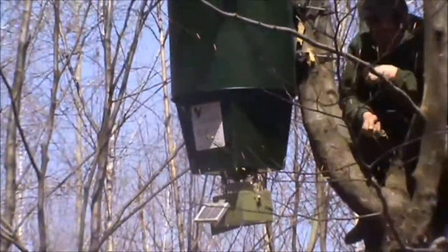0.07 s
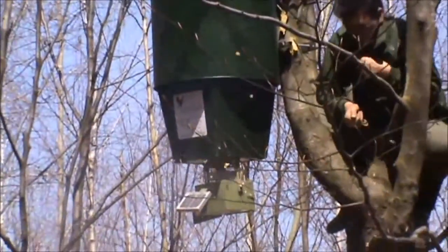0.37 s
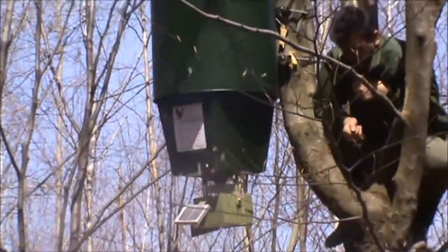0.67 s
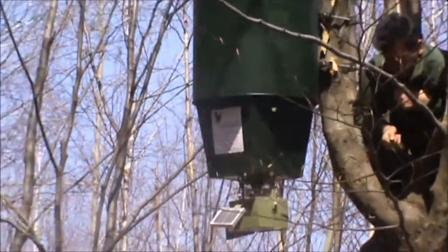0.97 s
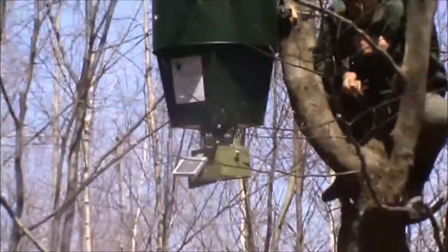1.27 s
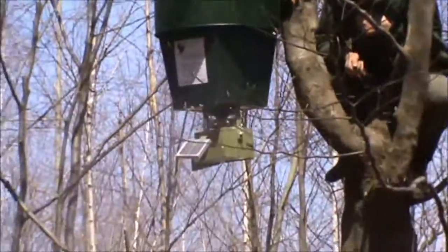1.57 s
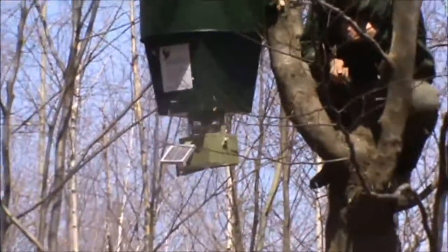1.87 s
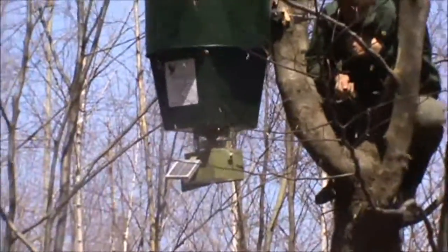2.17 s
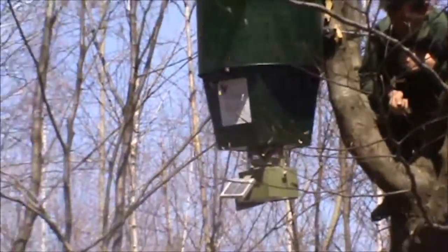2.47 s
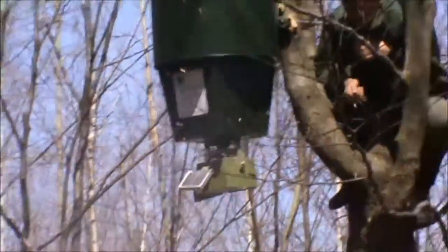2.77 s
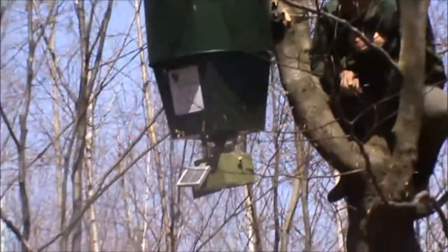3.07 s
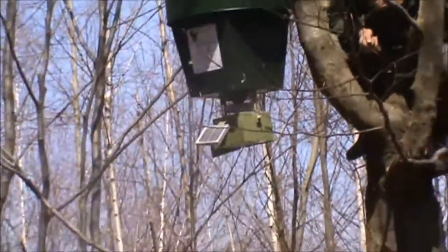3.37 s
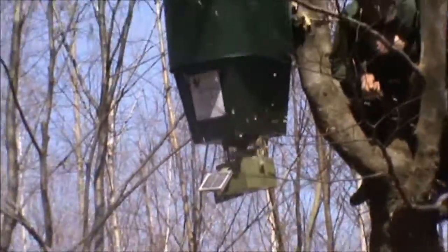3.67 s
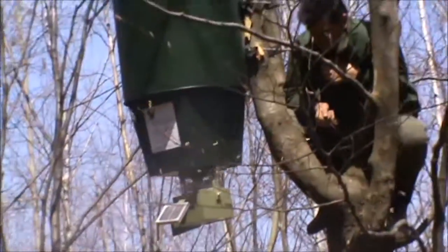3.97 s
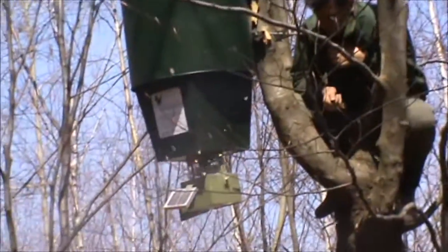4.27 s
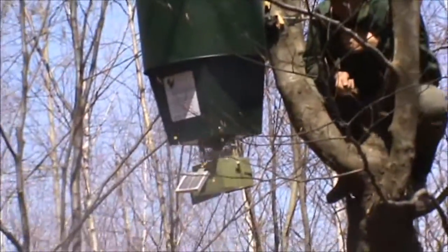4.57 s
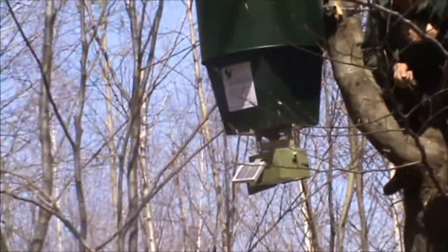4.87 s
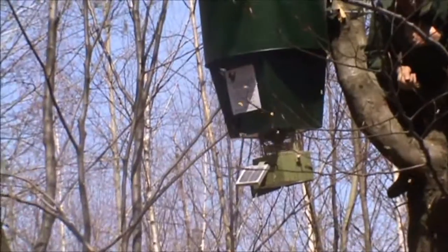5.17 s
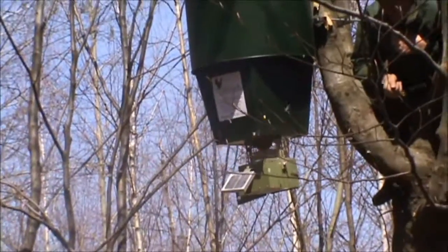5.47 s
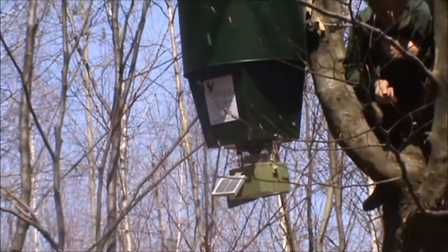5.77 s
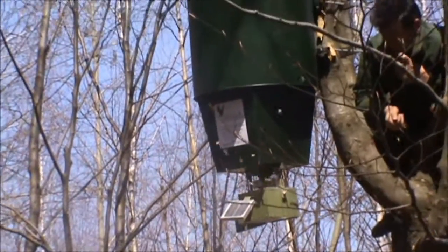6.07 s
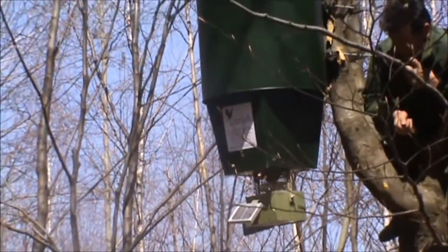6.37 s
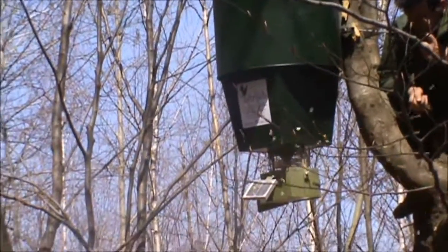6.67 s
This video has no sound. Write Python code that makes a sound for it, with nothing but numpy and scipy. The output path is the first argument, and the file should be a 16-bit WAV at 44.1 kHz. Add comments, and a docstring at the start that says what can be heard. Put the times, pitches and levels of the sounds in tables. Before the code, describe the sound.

Outdoors among trees, grain sprays off a feeder's spinning metal plate in a bright, continuous, rattling hiss, with the motor shaking the housing into a low drone. A stray kernel knocks sharply early on, and a few more tick later. Through the middle, brief jolts thump the hollow housing, and the spray dips twice before recovering. Soft puffs of air brush the microphone.

```python
"""A game feeder runs at full speed in a tree: its motor whirls a metal plate that flings grain at the guard.
From the start, thousands of kernel hits a second merge into a ringing hiss over the drone of the shaken
housing; a faint breeze rumbles on the microphone. From 0.1 s stray kernels knock on things nearby, and from 0.2
s puffs of air pass. Between 2.2 and 5.3 s hard jolts make the housing boom. At 2.7 and 4.2 s the hiss and drone
dip abruptly, then creep back."""
import sys
import numpy as np
from scipy import signal
from scipy.fft import rfft, irfft, next_fast_len
from scipy.io import wavfile
from scipy.ndimage import map_coordinates

SR = 44100
rng = np.random.default_rng(int(sys.argv[2]) if len(sys.argv) > 2 else 0)


def wrap_up_sound(samples):
    """Save the sound to the file named by the first command line argument, as 16-bit audio."""
    columns = np.atleast_2d(samples).T
    # keep every value between -1 and 1, then stretch to whole-number steps
    tamed = np.clip(columns, -1, 1)
    steps = np.round(tamed * 32767).astype(np.int16)
    wavfile.write(sys.argv[1], SR, steps)


N = 304819


def amp(db):
    """Decibels to gain."""
    return 10 ** (np.asarray(db) / 20)


def rms(x):
    """Root mean square."""
    return np.sqrt(np.mean(x ** 2) + 1e-20)


def along(points, hz):
    """(frequency [Hz], value) points read on a log axis."""
    point_hz, values = np.transpose(points)
    return np.interp(np.log(hz + 1), np.log(np.abs(point_hz) + 1), values)


def curves(rows):
    """One value per sample for each column after the time."""
    times_s, *columns = np.transpose(rows)
    return [np.interp(np.arange(N) / SR, times_s, column) for column in columns]


def wobble(rate_hz, samples=np.arange(N)):
    """Smooth random curve, rate_hz knots a second."""
    knots = rng.standard_normal(int(N * rate_hz / SR) + 4)
    return map_coordinates(knots, [samples * rate_hz / SR])


def scatter(count, limit):
    """Normal draws, clipped at +/- limit."""
    return np.clip(rng.standard_normal(count), -limit, limit)


def filtered(x, response):
    """x through a complex response of frequency."""
    size = next_fast_len(N + SR // 4, real=True)
    return irfft(rfft(x, size) * response(np.fft.rfftfreq(size, 1 / SR)), size)[..., :N]


def resonance(f, hz, width_hz):
    """Causal response of one mode, 1 at its peak."""
    return 1j * f * width_hz / (hz * hz - f * f + 1j * f * width_hz)


def rumble(spectrum):
    """Shaped noise, rms 1."""
    noise = filtered(rng.standard_normal(N), lambda f: amp(along(spectrum, f)))
    return noise / rms(noise)


def add(track, start_s, sound):
    """Mix a short sound into a track."""
    part = track[max(round(start_s * SR), 0):][:len(sound)]
    part += sound[:len(part)]


def kernel_hits(flow, per_s, size_db, clump_db, clump_hz):
    """Impulses on one surface, rms 1: kernels of uneven size arrive in clumps."""
    density_per_s = per_s * flow * amp(clump_db * wobble(clump_hz))
    struck = np.flatnonzero(rng.random(N) < density_per_s / SR)
    hits = np.zeros(N)
    hits[struck] = amp(size_db * scatter(len(struck), 2))
    return hits / rms(hits)


# plate and guard modes: (frequency [Hz], width [Hz], gain [dB])
METAL_MODES = [(1279, 32, -13.7), (1364, 42, -10.1), (1449, 16, -18.8), (1648, 122, -12.7),
               (2000, 324, -17.3), (2545, 54, -14.3), (2891, 85, -7.8), (3221, 121, -10.8),
               (3665, 145, -17.0), (4018, 119, -8.3), (4217, 76, -14.1), (4521, 121, -14.4),
               (4698, 154, -13.9), (5439, 138, -12.9), (5640, 104, -7.6), (5856, 47, -12.9),
               (6022, 71, -12.7), (6209, 112, -14.7), (6517, 121, -11.6), (6877, 326, -18.2),
               (8890, 274, -11.9), (9747, 204, -12.9), (10082, 194, -7.7), (10816, 309, -12.3),
               (11137, 54, -8.9), (12240, 574, -11.9), (12969, 805, -9.9)]

def clatter(hits, spot_db, wander_db, wander_hz, cluster_hz, highpass_hz):
    """Each kernel lands on another spot of the metal and rings the modes at new strengths."""
    struck, ring = np.flatnonzero(hits), np.zeros(N)
    for hz, width_hz, db in METAL_MODES:
        # the stream wanders over the guard, favouring each mode in turn
        favour_db = wander_db * wobble(wander_hz, struck)
        # peaks wider than cluster_hz hold many modes, which average out
        averaging = min(1, (cluster_hz / width_hz) ** 0.5)
        strength_db = averaging * (spot_db * scatter(len(struck), 3) + favour_db)
        push = np.zeros(N)
        push[struck] = hits[struck] * rng.choice([-1, 1], len(struck)) * amp(strength_db)
        ring += amp(db) * signal.lfilter(*signal.iirpeak(hz, hz / width_hz, SR), push / rms(push))
    # the small plate radiates little bass
    return signal.lfilter(*signal.butter(2, highpass_hz, "high", fs=SR), ring)


# dry crack of a kernel: (frequency [Hz], gain [dB])
CRACK_SPECTRUM = [(150, -42.5), (300, -35), (600, -44), (1100, -31.5), (1700, -33), (2500, -35),
                  (5000, -24.5), (7500, -20.5), (9000, -15.5), (13000, -24), (14000, -20), (15600, -20)]

def crackle(hits, t60_s, colour_db):
    """Each hit is a short noise burst with its own share of every band."""
    edges_hz = [0, 2500, 5000, 8000, 11000, 16000]
    fade = amp(-60 * np.arange(SR // 20) / SR / t60_s)
    out = np.zeros(N)
    for low_hz, high_hz in zip(edges_hz, edges_hz[1:]):
        sizes = hits * amp(colour_db * scatter(N, 2))
        power = np.abs(signal.oaconvolve(sizes ** 2, fade ** 2)[:N])
        burst = np.sqrt(power / power.mean()) * rng.standard_normal(N)
        out += filtered(burst, lambda f: amp(along(CRACK_SPECTRUM, f)) * (f >= low_hz) * (f < high_hz))
    return out


# notches where neighbouring modes cancel: (frequency [Hz], width [Hz], depth [0-1])
ANTIRESONANCES = [(1005, 54, 0.7), (1490, 26, 0.4), (2346, 35, 0.57), (2750, 130, 0.02), (3350, 44, 0.2)]

def spinner(flow, hiss_db, ring_db, split_hz=7300):
    """Kernels strike plate and guard: square hits ring the modes, glancing ones hiss, hard ones tick."""
    def notches(f):
        cuts = [1 - depth * resonance(f, hz, width_hz) for hz, width_hz, depth in ANTIRESONANCES]
        return np.prod(cuts, axis=0)

    square = kernel_hits(flow, per_s=3800, size_db=1, clump_db=0.5, clump_hz=100)
    glancing = kernel_hits(flow, per_s=6700, size_db=1, clump_db=0.4, clump_hz=31)
    hard = kernel_hits(flow, per_s=130, size_db=2.5, clump_db=1, clump_hz=20)
    spray = clatter(square, spot_db=5.5, wander_db=1.5, wander_hz=45, cluster_hz=300, highpass_hz=960)
    spray += amp(-1.1) * crackle(glancing, t60_s=0.018, colour_db=6.5)
    spray += amp(-4.5) * crackle(hard, t60_s=0.032, colour_db=3)
    spray = filtered(spray, notches)
    ring = filtered(spray, lambda f: f < split_hz)
    hiss = spray - ring
    return amp(hiss_db) * hiss / rms(hiss) + amp(ring_db) * ring / rms(ring)


# motor housing and hopper modes: (frequency [Hz], width [Hz], gain [dB])
HOUSING_MODES = [(372.5, 42.6, -11.5), (409.2, 49.5, -6.5), (511.3, 44.6, -9.5), (706, 128, -23.5),
                 (898, 230, -23)]

def housing(flow, band_db):
    """The motor and grain dragged under its plate shake the hollow housing into a rough drone."""
    shake = kernel_hits(flow, per_s=2200, size_db=2, clump_db=2.5, clump_hz=70)
    drone = np.zeros(N)
    for hz, width_hz, db in HOUSING_MODES:
        push = shake * rng.standard_normal(N)
        drone += filtered(push, lambda f: amp(db) * resonance(f, hz, width_hz) ** 2)
    band = filtered(drone, lambda f: (f > 330) & (f < 560))
    return amp(band_db) * drone / rms(band)


# slow swell of the grain stream: (time [s], hiss level [dB], ring re hiss [dB])
GRAIN_STREAM = [(0.0, -15.5, -3.5), (0.48, -15.5, -5), (0.6, -16, -3), (1.1, -15.5, -3.5), (1.8, -16, -3.5),
                (2.6, -14.5, -3.5), (3.2, -14.5, -3), (3.9, -15, -4), (5.3, -16.0, -3.5),
                (5.8, -15.7, -4.5), (6.9, -15, -3.5)]

def feeder(flow, drone_re_ring_db=-11.5, drone_db_per_db=1.15):
    """One face of the feeder: grain hisses and rings on the metal; the drone follows the ring's level."""
    hiss_db, ring_re_hiss_db = curves(GRAIN_STREAM)
    ring_db = hiss_db + ring_re_hiss_db
    drone_db = ring_db.mean() + drone_re_ring_db + drone_db_per_db * (ring_db - ring_db.mean())
    return spinner(flow, hiss_db, ring_db) + housing(flow, drone_db)


# uneven grain flow: (rate [Hz], depth [dB])
FLOW_SURGES = [(3, 0.09), (14, 0.82), (55, 0.67)]

def grain_flow():
    """Factor on the hit rate: grain leaves the hopper in surges."""
    return amp(sum(depth_db * wobble(rate_hz) for rate_hz, depth_db in FLOW_SURGES))


# scatter from the trees: (frequency [Hz], side gain [dB])
TREE_SCATTER = [(60, -23), (200, -49), (380, -13), (700, -8.5), (1300, -11.5), (4400, -9), (8100, -9.5),
                (15000, -20.5)]
# phase between microphone ports: (frequency [Hz], left lead [rad])
PORT_PHASE = [(0, 0.93), (1030, -0.67), (1290, -0.5), (1980, -0.85), (2410, 0.18), (3100, -0.81),
              (4050, -0.45), (4910, -0.38), (5170, -0.2), (5430, -0.48), (6370, -0.2), (8350, -0.1),
              (10100, -0.17), (15900, 0.059)]

def woodland(direct, far_face):
    """Trunks scatter the far face's sound in from the sides; direct sound reaches one port earlier."""
    side = filtered(far_face, lambda f: amp(along(TREE_SCATTER, f)))
    side += filtered(direct, lambda f: 1j * np.tan(along(PORT_PHASE, f) / 2))
    return np.array([direct + side, direct - side])


# breeze rumble: (frequency [Hz], gain [dB])
BREEZE_SPECTRUM = [(15, -1.5), (30, -7), (60, 4), (100, -6), (150, -7), (250, -19), (800, -65)]

def breeze(lump_db, lump_hz, start_db=-60, fade_db_per_s=0.8):
    """A faint lumpy breeze rumbles on the microphone, slowly dying down."""
    t = np.arange(N) / SR
    level_db = start_db - fade_db_per_s * t + lump_db * wobble(lump_hz)
    return amp(level_db) * rumble(BREEZE_SPECTRUM)


# kernels landing nearby: (time [s], tick level [dB], tick pitch [Hz], thud level [dB])
STRAY_KERNELS = [(0.089, -22, 990, -46), (0.552, -10, 1360, -19.5), (0.610, -20, 1090, -35),
                 (2.063, -14, 1190, -44), (2.082, -30, 1300, -40), (3.197, -33, 910, -42),
                 (3.716, -36, 990, -38), (4.108, -22, 690, -47), (4.225, -26, 950, -58),
                 (4.778, -38, 900, -38), (5.269, -17, 1440, -47)]

def strays(tick_t60_s, tick_attack_s, tick_q, thud_hz, thud_peak_s):
    """A stray kernel gives a gritty pitched tick, then a hollow thud that swells and dies."""
    out, t = np.zeros(N), np.arange(SR // 6) / SR
    tick_envelope = amp(-60 * t / tick_t60_s) * (1 - np.exp(-t / tick_attack_s))
    thud_envelope = (t / thud_peak_s * np.exp(1 - t / thud_peak_s)) ** 2
    thud = np.sin(2 * np.pi * thud_hz * t) * thud_envelope
    for start_s, tick_db, tick_hz, thud_db in STRAY_KERNELS:
        body = signal.iirpeak(tick_hz, tick_q, SR)
        grit = signal.lfilter(*body, signal.lfilter(*body, rng.standard_normal(len(t))))
        tick = (np.sin(2 * np.pi * tick_hz * t) + grit / rms(grit)) * tick_envelope
        add(out, start_s, amp(tick_db) * tick + amp(thud_db) * thud)
    return out


# puffs of air: (peak time [s], half-width [s], level [dB])
AIR_PUFFS = [(0.23, 0.06, -49), (0.37, 0.12, -51), (1.14, .035, -48), (1.514, 0.037, -50),
             (1.76, 0.029, -51), (2.062, 0.054, -56), (2.36, .13, -46), (2.506, .04, -44), (2.66, .04, -53),
             (4.78, .03, -52), (5.11, .06, -43), (5.977, 0.05, -52), (6.45, .035, -50)]
# puff rumble: (frequency [Hz], gain [dB])
PUFF_SPECTRUM = [(15, -11), (30, -3), (60, 0), (100, 3), (150, -9), (250, -20), (800, -65)]

def puffs():
    """Puffs of air swell on the microphone and pass."""
    t = np.arange(N) / SR
    envelope = sum(amp(db) * np.exp(-2 * ((t - peak_s) / half_s) ** 2)
                   for peak_s, half_s, db in AIR_PUFFS)
    return envelope * rumble(PUFF_SPECTRUM)


# hard jolts of the housing: (time [s], level [dB])
HOUSING_JOLTS = [(2.212, -23), (2.487, -20), (3.200, -22), (3.280, -22), (3.596, -24), (4.109, -15.5),
                 (4.838, -22), (5.328, -21.5)]

def jolts(boom_hz, peak_s):
    """Each jolt makes the housing boom once."""
    out, t = np.zeros(N), np.arange(SR // 8) / SR
    boom = np.sin(2 * np.pi * boom_hz * t) * t / peak_s * np.exp(1 - t / peak_s)
    for start_s, db in HOUSING_JOLTS:
        add(out, start_s, amp(db) * boom)
    return out


# sudden dips in the hiss and drone: (time [s], gain [dB], recovery [s])
LEVEL_DROPS = [(2.668, -4.5, 1.58), (4.168, -4.5, 1.4)]

def drops(fall_s):
    """Gain that falls abruptly and creeps back."""
    t, gain_db = np.arange(N) / SR, np.zeros(N)
    for start_s, db, recovery_s in LEVEL_DROPS:
        fallen = np.clip((t - start_s) / fall_s, 0, 1)
        remaining = np.clip(1 - (t - start_s) / recovery_s, 0, 1)
        gain_db += db * fallen * remaining
    return amp(gain_db)


def scene():
    """The feeder, heard directly and through the trees, with knocks and moving air; stereo."""
    flow = grain_flow()
    gain = drops(fall_s=0.008)
    knocks = strays(tick_t60_s=0.031, tick_attack_s=0.0012, tick_q=1.4, thud_hz=237, thud_peak_s=0.0076)
    knocks += jolts(boom_hz=399, peak_s=0.008)
    direct = gain * feeder(flow) + knocks + breeze(lump_db=3, lump_hz=22) + puffs()
    eddies = amp(-15) * (breeze(lump_db=4, lump_hz=12) + puffs())  # air that differs between the ports
    far_face = gain * feeder(flow)
    balance = amp([[-0.15], [0.15]])
    return (woodland(direct, far_face) + np.array([eddies, -eddies])) * balance


def record(dry):
    """Soft peak limit, then a brick-wall low-pass."""
    ceiling, top_hz = 0.95, 15740
    rounded = dry / (1 + np.abs(dry / ceiling) ** 8) ** (1 / 8)
    return filtered(rounded, lambda f: f < top_hz)


dry = scene()
out = record(dry)
wrap_up_sound(out)
```